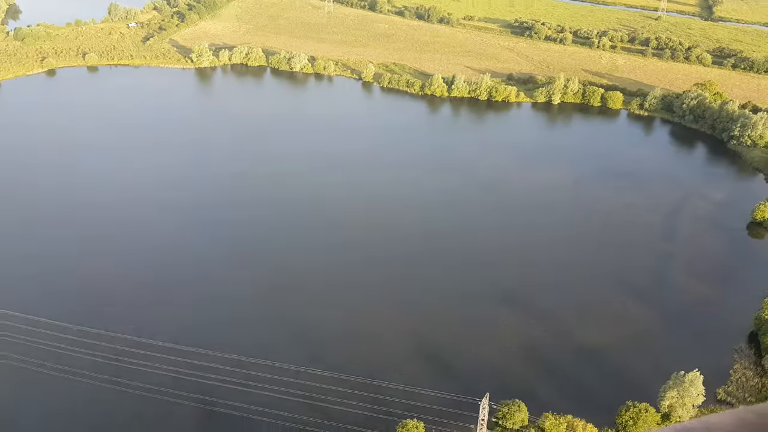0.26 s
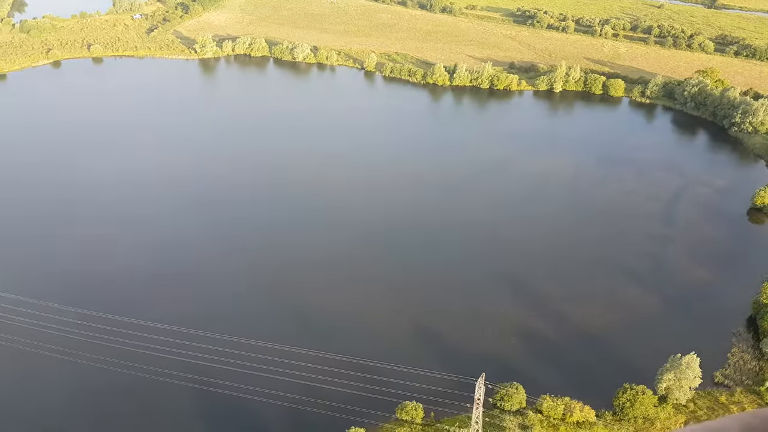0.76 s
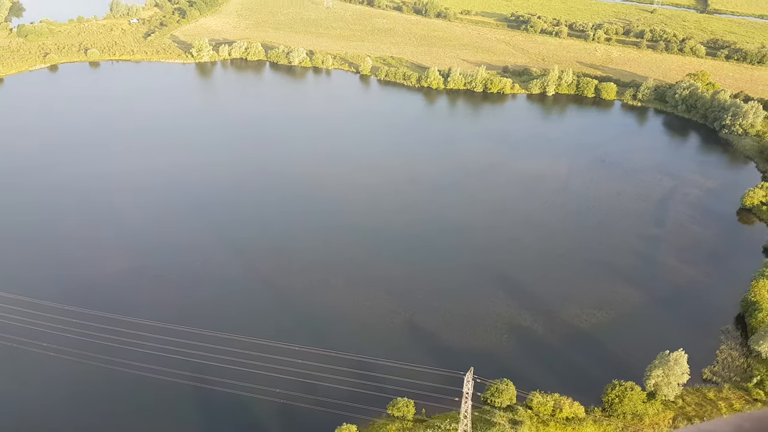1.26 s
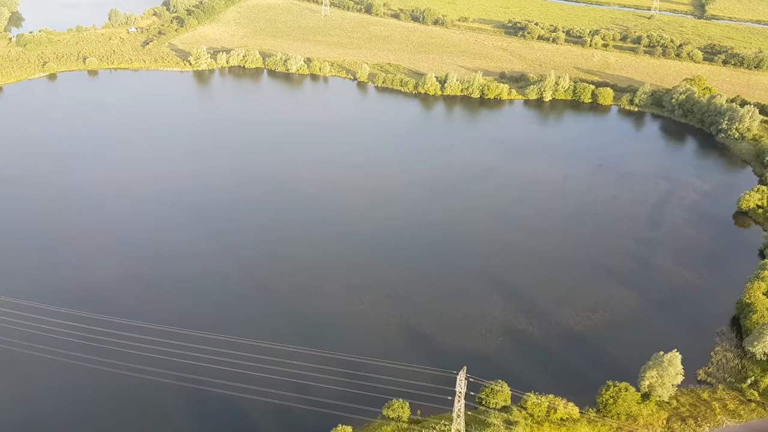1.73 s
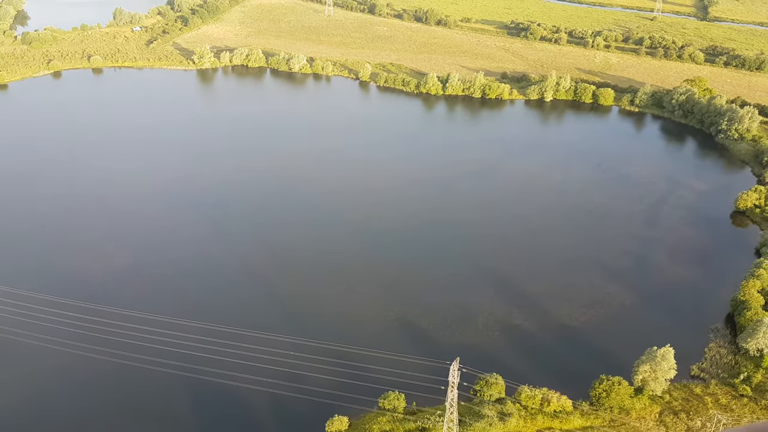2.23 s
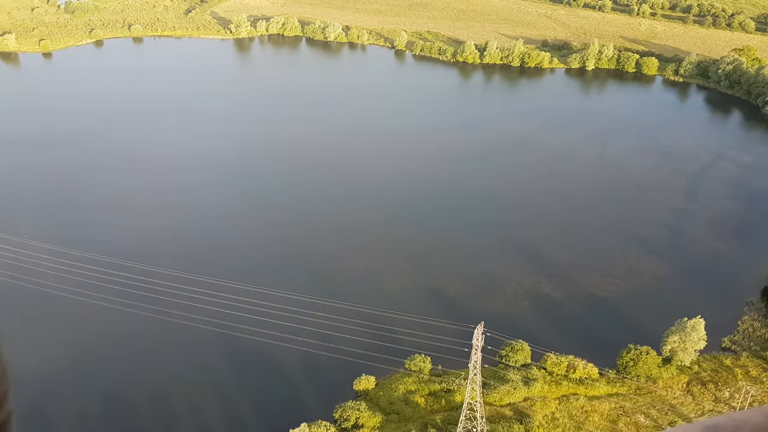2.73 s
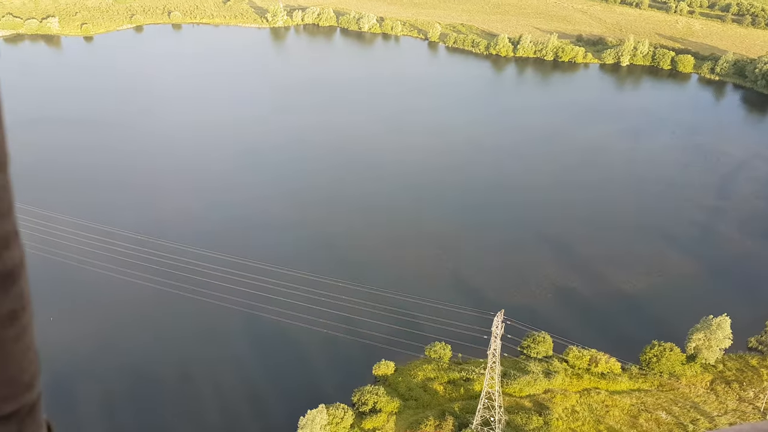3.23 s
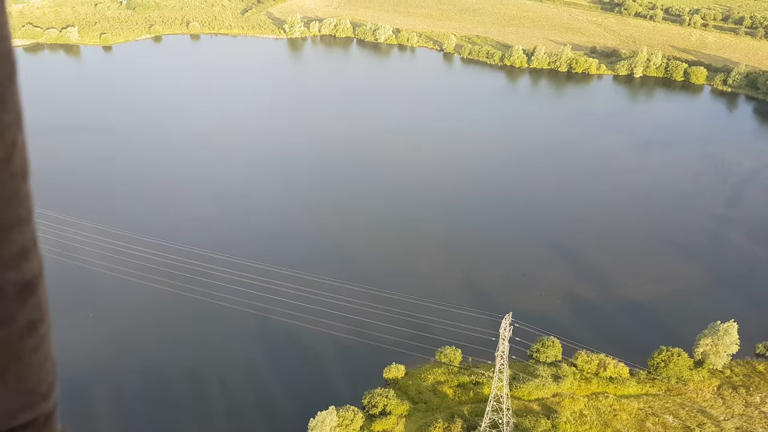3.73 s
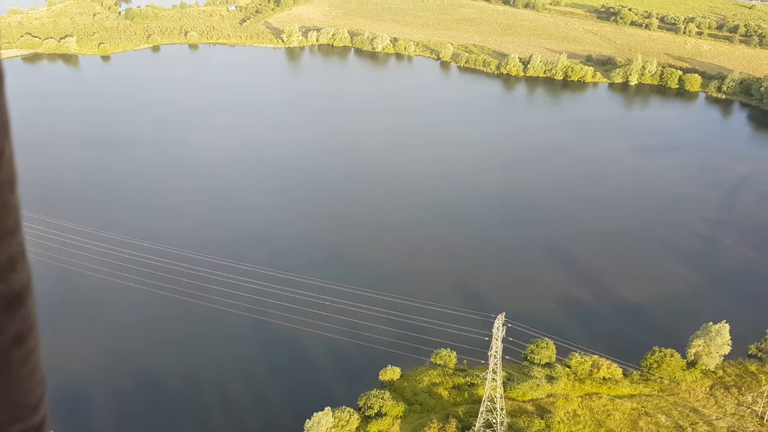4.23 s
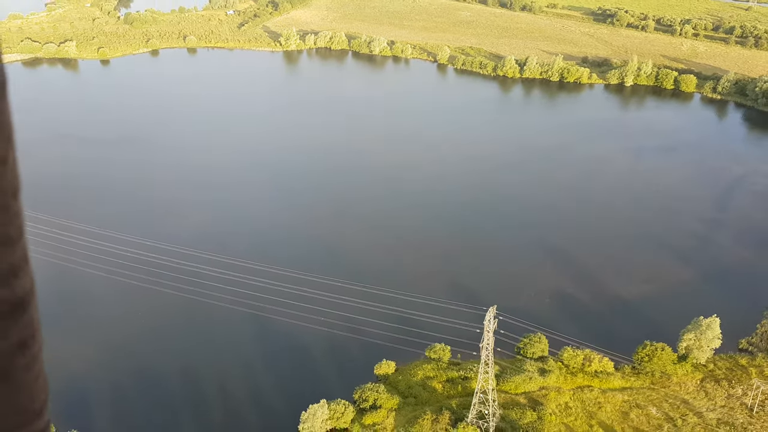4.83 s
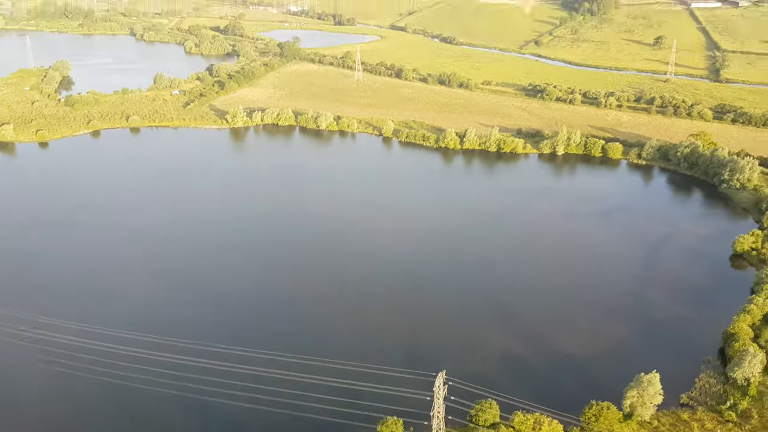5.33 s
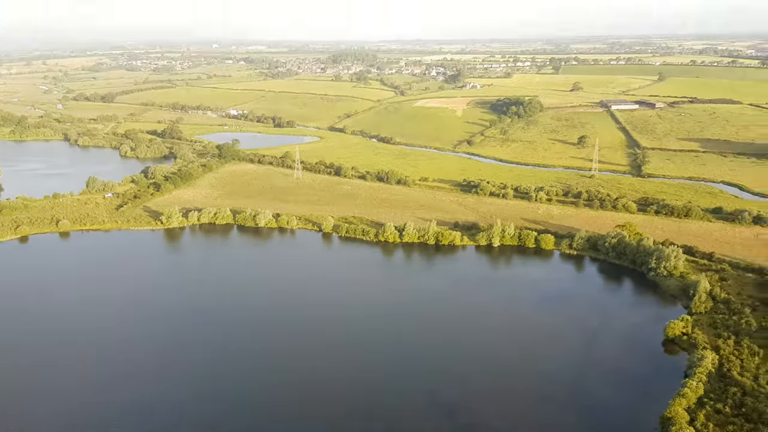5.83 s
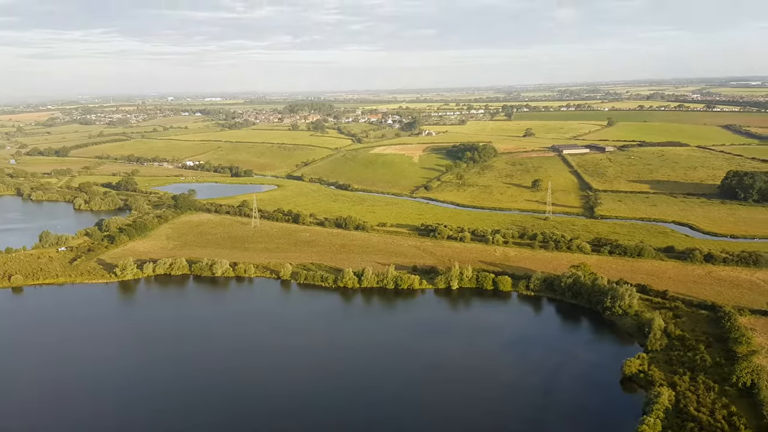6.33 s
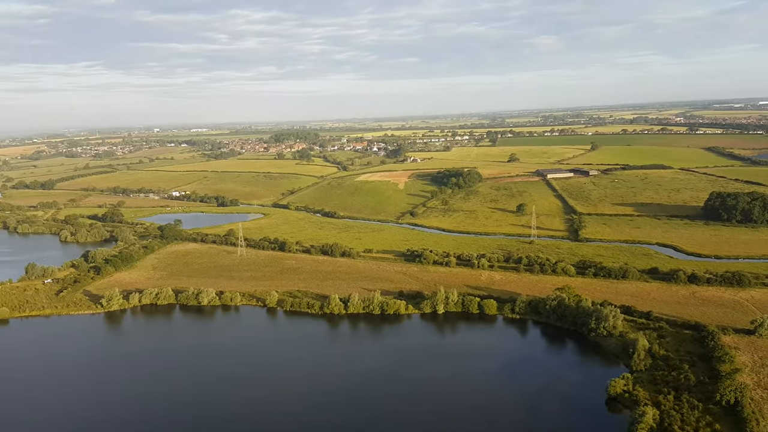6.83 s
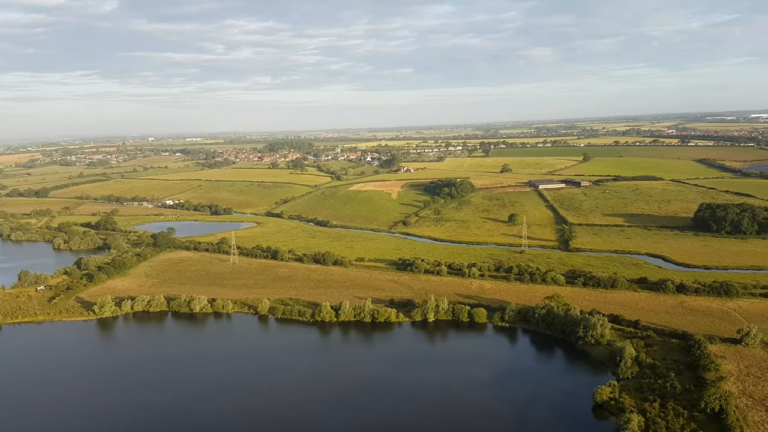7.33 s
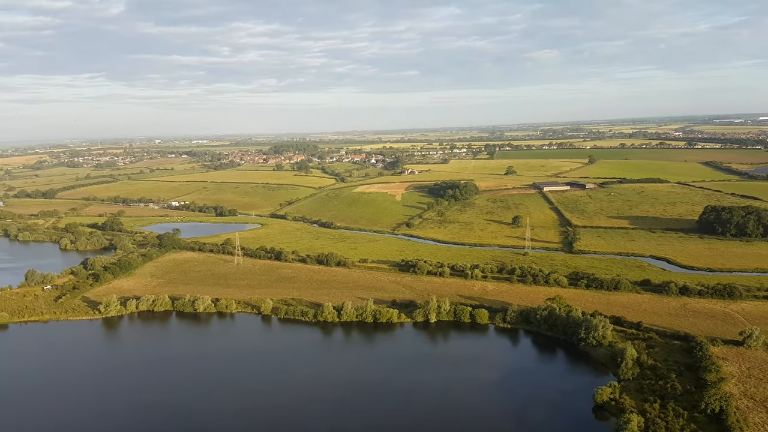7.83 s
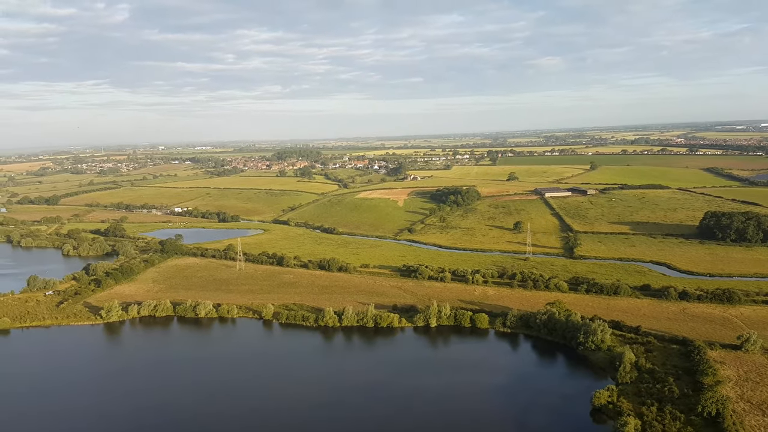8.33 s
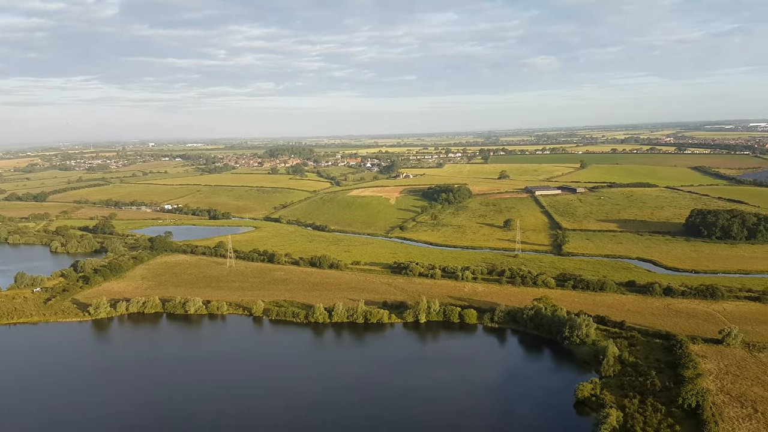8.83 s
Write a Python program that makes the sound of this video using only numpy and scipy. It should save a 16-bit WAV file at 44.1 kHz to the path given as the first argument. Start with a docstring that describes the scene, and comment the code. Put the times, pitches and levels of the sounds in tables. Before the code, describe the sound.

Five quiet seconds of thin, resonant gas hiss with dull wind bumps and a few soft cloth brushes, over barely audible far traffic. Then a sudden burner blast with a low ignition thump, rough roaring flame and sharp jet hiss, lasting nearly two seconds and ending in a deep flutter. After a subdued lull, it blasts again at full force to the cut. Open air, handheld stereo microphone in the basket, automatic gain pulling down under each blast.

```python
"""A pilot flame hisses steadily, soon joined by a far road, small puffs of air and a soft rustle.
Then a hot-air balloon's propane burner fires twice, heard from the basket high over quiet fields.
Filtered noise makes every source: the burner is a hissing gas jet and a roaring, turbulent flame.
As the valve eases shut after the first blast, the flame billows deeply and dies; the second burns to the end.
The recorder turns its gain down under each blast and slowly brings it back."""
import sys
import numpy as np
from scipy import signal
from scipy.fft import rfft, irfft, next_fast_len
from scipy.io import wavfile
from scipy.ndimage import map_coordinates

SR = 44100
rng = np.random.default_rng(int(sys.argv[2]) if len(sys.argv) > 2 else 0)


def file_out(sig):
    """Save sig as 16-bit WAV at sys.argv[1]."""
    # one column per channel
    cols = np.atleast_2d(sig).T
    # limit, then scale
    lim = np.clip(cols, -1, 1)
    pcm = np.round(lim * 32767).astype(np.int16)
    wavfile.write(sys.argv[1], SR, pcm)


N = 399546
TIME = np.arange(N) / SR
SIZE = next_fast_len(N)
HZ = np.maximum(np.fft.rfftfreq(SIZE, 1 / SR), 1)   # at least 1 Hz, so its logarithm exists


def from_db(db):
    """Turn decibels into gain."""
    return np.exp(np.asarray(db) * (np.log(10) / 20))


def in_time(rows):
    """Read each column of a time curve at every sample."""
    seconds, *columns = np.transpose(rows)
    return [np.interp(TIME, seconds, column) for column in columns]


def over_hz(rows):
    """Read each column of a table at every frequency, along a logarithmic pitch scale."""
    hz, *columns = np.transpose(rows)
    return np.array([np.interp(np.log(HZ), np.log(hz), column) for column in columns])


def drift(rate_hz):
    """Smooth random wandering with spread 1; a higher rate wanders faster."""
    step = 20   # computed at every 20th sample, then joined by straight lines
    r = np.exp(-2 * np.pi * step * rate_hz / SR)
    noise = rng.standard_normal(N // step + 2002)
    slow = signal.lfilter([1], [1, -2 * r, r * r], noise)[2000:]   # skip the start-up
    return np.interp(np.arange(N) / step, np.arange(len(slow)), slow / slow.std())


def below(hz, order):
    """Gain that keeps what lies below a frequency; a higher order cuts more steeply."""
    return 1 / np.sqrt(1 + (HZ / hz) ** (2 * order))


def above(hz, order):
    """Gain that keeps what lies above a frequency."""
    return np.sqrt(1 - below(hz, order) ** 2)


def resonance(hz, width_hz):
    """A peak of height 1 that falls away on both sides."""
    return 1 / (1 + (2 * (HZ - hz) / width_hz) ** 2)


def turbulence(colour, likeness, phase):
    """Coloured noise at two microphone ports, partly shared and shifted in phase; their mean has rms 1."""
    mid, side = rfft(rng.standard_normal((2, SIZE)))
    alike = np.clip(likeness, 0, 1)
    ports = np.sqrt(1 + alike) * mid + np.sqrt(1 - alike) * side * [[1], [-1]]
    shift = np.exp(.5j * phase * [[1], [-1]])
    x = irfft(ports * colour * shift, SIZE)[:, :N]
    return x / x.mean(axis=0).std()


def swell(centre_s, length_s):
    """A rounded rise and fall about one moment."""
    span = np.linspace(-2, 2, 20)
    return np.interp(TIME, centre_s + span * abs(length_s), np.exp(-span ** 2), left=0, right=0)


def spells(rows, fade_s):
    """Each spell fades in, holds its level and fades out."""
    total = 0
    for start, end, db in rows:
        shape = np.interp(TIME, [start - fade_s, start, end, end + fade_s], [0, 1, 1, 0])
        total = total + from_db(db) * shape
    return total


# tyres on a far road, growing overall: (time [s], level before a slow waver [dB])
ROAD = [(0, -73), (1, -57), (3.1, -56.5), (5.1, -49.5), (8.35, -51.5)]


def far_road(centre_hz=1000, width_hz=400, waver_db=1.5):
    """Distance leaves only the tyres' band near a kilohertz."""
    level_db, = in_time(ROAD)
    tyres = turbulence(resonance(centre_hz, width_hz), 1.0, over_hz(PILOT_PHASE))
    return from_db(level_db + waver_db * drift(1.1)) * tyres


# spells of air moving past the microphone: (start [s], end [s], level before the lumps [dB])
BREEZES = [(0.7, 2.4, -61), (7.2, 7.7, -55)]
# the strongest single puffs: (time [s], level [dB], left minus right [dB])
PUFFS = [(0.537, -57, 2), (0.735, -54, -7), (0.8, -52, 0), (1.063, -51, 6), (1.24, -50, 4),
         (1.355, -48, -3), (1.605, -51.5, 2), (1.91, -54, 16), (2.095, -53, -17), (2.204, -54, -4),
         (2.853, -58, -14), (7.62, -55, 13)]
# colour of the moving air: (frequency [Hz], relative level [dB per Hz])
BREEZE_COLOUR = [(25, -14), (60, 2), (100, 0.5), (170, -2), (260, -7), (400, -13), (800, -15), (3000, -65)]
CALM_DB, BREEZE_FADE_S, PUFF_S = -69, 0.19, 0.032


def breeze(lump_db=2.5, lumps_hz=22):
    """Lumps of moving air nudge the microphone, differently at each port."""
    lumps = from_db(lump_db * np.array([drift(lumps_hz), drift(lumps_hz)]))
    push = (from_db(CALM_DB) + spells(BREEZES, BREEZE_FADE_S)) * lumps
    for s, db, pan_db in PUFFS:
        push = push + from_db([[db + pan_db / 2], [db - pan_db / 2]]) * swell(s, PUFF_S)
    return push * turbulence(from_db(over_hz(BREEZE_COLOUR)), 0.12, np.zeros(1))


# spells of soft rubbing: (start [s], end [s], level before the uneven catching [dB])
RUSTLES = [(2.2, 2.55, -54), (4.05, 4.2, -51), (4.33, 4.83, -45.5)]
# short brushes within the rustle: (time [s], level [dB])
BRUSHES = [(2.259, -42.5), (2.325, -46), (2.403, -46), (2.467, -45), (2.542, -43), (4.16, -44.5),
           (4.29, -47)]
# colour of the rubbing: (frequency [Hz], relative level [dB per Hz])
RUSTLE_COLOUR = [(40, -16), (130, -8), (260, 0.5), (420, 2.5), (650, -4), (1000, -5.5), (1600, -16),
                 (5000, -53)]
RUSTLE_FADE_S = 0.12


def rustle(catch_db=1.0, brush_s=0.0069, brush_low_hz=220, brush_top_hz=1100):
    """A dull, uneven rubbing with a few short, brighter strokes, as of a sleeve."""
    rubbing = spells(RUSTLES, RUSTLE_FADE_S) * from_db(catch_db * drift(33))
    rub = rubbing * turbulence(from_db(over_hz(RUSTLE_COLOUR)), 0.93, np.zeros(1))
    strokes = sum(from_db(db) * swell(s, brush_s) for s, db in BRUSHES)
    brush_colour = above(brush_low_hz, order=1) * below(brush_top_hz, order=3)
    return rub + strokes * turbulence(brush_colour, .8, np.zeros(1))


def basket(share, count=10):
    """Frame, cylinders and wicker scatter the treble: faint echoes of a few ms, different at each port."""
    taps = np.zeros((2, SIZE))
    for port in taps:
        delays_s = rng.uniform(.001, .012, count)
        port[(delays_s * SR).astype(int)] = rng.choice([-1, 1], count)
    return 1 + share / np.sqrt(count) * rfft(taps) * above(2250, order=2)


# the pilot's broad rush: (frequency [Hz], relative left level [dB], relative right level [dB])
PILOT_BED = [(25, -18, -21), (90, -17, -17), (170, -18.5, -18.5), (422, -14, -13.5), (570, -17, -13.5),
             (1190, -13.5, -10), (2900, -25.5, -21.5), (4370, -26.5, -19.5), (6240, -33.5, -28),
             (8800, -36.5, -37.5), (15500, -34, -43)]


def pilot_colour(modes):
    """Resonances standing out of a broad rush, scattered by the basket."""
    power = from_db(over_hz(PILOT_BED)) ** 2
    for hz, width_hz, left_db, right_db in modes:
        power = power + (from_db([[left_db], [right_db]]) * resonance(hz, width_hz)) ** 2
    return np.sqrt(power) * basket(share=0.38)


# resonances of the pilot's hiss, microphone facing down:
# (frequency [Hz], width [Hz], relative left level [dB], relative right level [dB])
PILOT_MODES = [(1480, 140, -12.5, -12), (1946, 230, -11.5, 1.5), (2060, 680, -16, -6),
               (3340, 400, -17, -7.5), (3910, 330, -16, -8.5), (4390, 166, -38, -11), (5295, 310, -27, -14),
               (7100, 740, -28, -23), (7700, 670, -31, -24.5), (10700, 530, -37, -39),
               (11331, 530, -30.5, -28), (13168, 926, -30, -29), (14592, 1100, -34, -27)]
# the same columns with the microphone facing the horizon
PILOT_MODES_AHEAD = [(1440, 350, -25, -26), (1875, 210, -8.5, 1.5), (2250, 200, -16, -9),
                     (3240, 70, -14, -4.5), (3670, 710, -27, -16.5), (4400, 600, -44, -29),
                     (4970, 300, -35, -16), (7000, 900, -31, -22), (7540, 790, -43, -32),
                     (10500, 600, -35, -32), (11160, 600, -26, -28), (13150, 800, -41, -28),
                     (14550, 1000, -33, -30)]
# how alike the pilot is at the two ports: (frequency [Hz], likeness [0 to 1])
PILOT_LIKENESS = [(80, 0.98), (280, 0.97), (750, 0.31), (1050, 0.9), (1400, 0.3), (1900, 0.9), (3500, 0.21),
                  (9000, .2)]
# how far the left port leads, for the road too: (frequency [Hz], phase lead [rad])
PILOT_PHASE = [(100, 0), (800, -.7), (1000, -1.4), (1300, -2.9), (1900, -2.2), (2400, -.5), (4000, -.8),
               (7000, -2)]
TURN_STARTS_S, TURN_ENDS_S = 5.1, 5.3   # the microphone tilts up
# hiss and low rush before wavering, and the gain added to both once facing the horizon
PILOT_HISS_DB, PILOT_RUSH_DB, PILOT_AHEAD_DB = -50, -51.5, 0.8


def pilot(split_hz=1600, waver_db=0.75, sway_rad=0.23, wander=0.008):
    """A small steady flame hisses in its tube; its colour changes as the microphone sways and turns."""
    likeness, phase = over_hz(PILOT_LIKENESS), over_hz(PILOT_PHASE)
    down, ahead = pilot_colour(PILOT_MODES), pilot_colour(PILOT_MODES_AHEAD)
    treble = above(split_hz, order=6)
    tilt = np.interp(TIME, [TURN_STARTS_S, TURN_ENDS_S], [0, 1])
    turn = tilt * np.pi / 2 + sway_rad * drift(0.55)
    hiss = np.cos(turn) * turbulence(down * treble, likeness, phase)
    hiss = hiss + np.sin(turn) * turbulence(ahead * treble, likeness, phase)
    rush = turbulence(down * below(split_hz, order=6), likeness, phase)
    # reading the hiss slightly faster or slower makes its resonances wander
    reading = np.cumsum(1 + wander * drift(0.6))
    hiss = np.array([map_coordinates(port, [reading], order=3, mode="mirror") for port in hiss])
    hiss = from_db(PILOT_HISS_DB + waver_db * drift(22)) * hiss
    rush = from_db(PILOT_RUSH_DB + waver_db * drift(7)) * rush
    return from_db(PILOT_AHEAD_DB * tilt) * (hiss + rush)


# colour of the gas jet: (frequency [Hz], relative level [dB per Hz])
JET = [(1300, 2), (1850, -7), (2220, -6), (3000, -4), (3300, -12.5), (3810, -9.5), (5850, -11), (6600, -11),
       (7680, -7), (9100, -18), (10600, -13), (12300, -11), (15800, -9.5)]
# resonances of the burner around the jet:
# (frequency [Hz], width [Hz], left boost [dB], right boost [dB])
JET_MODES = [(1470, 180, 0.5, 2.5), (2210, 200, -5, 5), (2873, 170, -9, -7.5), (3760, 330, 2.5, 2.5),
             (7560, 260, -6.5, -0.5)]


def jet_colour():
    """Broad hiss with the burner's resonances on it, scattered by the basket."""
    peaks_db = 0
    for hz, width_hz, left_db, right_db in JET_MODES:
        peaks_db = peaks_db + np.array([[left_db], [right_db]]) * resonance(hz, width_hz)
    return from_db(over_hz(JET) + peaks_db) * basket(share=0.31)


# how alike the burner is at the two ports: (frequency [Hz], likeness [0 to 1])
BURNER_LIKENESS = [(100, .999), (450, 0.97), (950, 1), (1300, 0.79), (2300, 0.54), (4000, 0.24),
                   (8000, 0.41), (15000, 0.12)]
# the burner's balance: (frequency [Hz], left minus right [dB])
BURNER_BALANCE = [(60, 2), (92, -2.5), (140, 0), (210, -1.5), (330, -1.0), (500, -2.5), (770, -2),
                  (1170, -2), (1790, -2.5), (2740, 0.5), (4190, -4.5), (6410, -2.5), (9810, -0.5),
                  (15000, -1.0)]
# how far the left port leads: (frequency [Hz], phase lead [rad])
BURNER_PHASE = [(60, -.15), (180, -.26), (370, -.43), (700, -.72), (1150, -1.1), (1500, -2.7), (2500, -2.5),
                (3300, -3.6), (4500, -5.9), (6200, -7.7), (7500, -9.8), (10000, -12.5), (15000, -17.5)]


def from_burner(colour):
    """Turbulence arriving from overhead, a little to the right."""
    lean = from_db(.5 * over_hz(BURNER_BALANCE) * [[1], [-1]])
    return turbulence(colour * lean, over_hz(BURNER_LIKENESS), over_hz(BURNER_PHASE))


# each part of the burner: (base level [dB], change per dB of gas flow [dB])
BILLOW, ROAR, RASP, HISS = (-12, 0.79), (-4, 0.91), (-7.5, 1), (-21, 0.74)
# the first gas lights with a thump and the jet surges: (delay [s], width [s], boost [dB])
IGNITION, SURGE = (0.044, 0.019, 9.1), (0.097, 0.056, 3.9)
# the valve snaps open; easing lowers the flow; once it is shut the flame outlives the gas
OPEN_S, EASED_DB, GAS_DIES_S, FLAME_DIES_S = 0.15, -10, 0.125, 0.15
# a starved flame goes soft and billows: boost, fully reached at this share of the easing
SOFT_FLAME_DB, SOFT_FLAME_AT = 14, 0.77
# vapour left in the coils burns on faintly: level against the full fire, and how long it lasts
AFTERBURN_DB, AFTERBURN_S = -36, 0.93


def blast(opens, eases, shuts, level_db, extra_rasp_db):
    """Gains of billow, roar, rasp and hiss in one blast: each follows the gas by a power law, then dies."""
    opening = from_db(level_db) * (1 - np.exp(-np.maximum(TIME - opens, 0) / OPEN_S))
    eased = np.interp(TIME, [eases, shuts], [0, 1])
    since_shut = np.maximum(TIME - shuts, 0)
    gas = np.exp(-(since_shut / GAS_DIES_S) ** 3)
    fire = np.exp(-(since_shut / FLAME_DIES_S) ** 3)
    vapour = np.sqrt(np.interp(TIME, [shuts, shuts + AFTERBURN_S], [1, 0]))
    low_fire = np.maximum(fire, from_db(AFTERBURN_DB) * vapour)
    thump_db, surge_db = (db * swell(opens + delay_s, width_s) for delay_s, width_s, db in (IGNITION, SURGE))
    soft_db = SOFT_FLAME_DB * np.minimum(eased / SOFT_FLAME_AT, 1)
    parts = [(BILLOW, low_fire, thump_db + soft_db), (ROAR, low_fire, 0),
             (RASP, fire, extra_rasp_db), (HISS, gas, surge_db)]
    gains = []
    for (db, follows), alive, extra_db in parts:
        gains.append(opening * alive * from_db(db + follows * EASED_DB * eased + extra_db))
    return np.array(gains)


# pulls on the burner valve, the last one still fully open when the sound ends:
# (opens [s], starts to ease [s], starts to shut [s], relative level [dB], extra rasp [dB])
BLASTS = [(5.117, 6.22, 6.92, -1.5, 1.5), (8.372, 9.5, 10.2, 2, 1)]
# colour of the flame: (frequency [Hz], relative level [dB per Hz])
FLAME = [(15, -60), (25, -25), (139, -5), (197, -7.5), (262, -0.5), (312, -5.5), (366, 2), (429, -5.5),
         (477, -5), (530, -8.5), (703, -7), (949, -10), (1110, -13), (1330, -23), (1700, -39), (2210, -61),
         (3740, -120)]


def burner(billow_hz=220, eddy_hz=520, jet_hz=1400, top_hz=4000, flutter_db=1.15, billow_flutter_db=2.38,
           sputter_db=0.97, flame_share=0.24, flare_db=0.25, body_db=-4.0, top_db=3.0):
    """Large eddies billow, smaller ones roar and rasp, and the jet that feeds them hisses."""
    billowing, roaring, rasping, hissing = sum(blast(*row) for row in BLASTS)
    flame = from_db(over_hz(FLAME))
    jet = jet_colour() * above(jet_hz, order=8)
    flutter = drift(25)   # the whole flame flutters together
    flicker = from_db(flutter_db * flutter)
    billow = from_burner(flame * below(billow_hz, order=6))
    billow = billowing * from_db(billow_flutter_db * flutter) * billow
    roar_band = above(billow_hz, order=6) * below(eddy_hz, order=6)
    roar = roaring * flicker * from_burner(flame * roar_band)
    rasp_band = above(eddy_hz, order=6) * below(jet_hz, order=8)
    rasp = rasping * flicker * from_burner(flame * rasp_band)
    sputter = sputter_db * drift(42)
    # the lower hiss partly follows the flame
    share = np.clip(flame_share, 0, 1)
    body_gain = hissing ** (1 - share) * rasping ** share
    body_gain = body_gain * from_db(body_db + sputter + flare_db * drift(37))
    body = body_gain * from_burner(jet * below(top_hz, order=4))
    top = hissing * from_db(top_db + sputter) * from_burner(jet * above(top_hz, order=4))
    return billow + roar + rasp + body + top


def scene():
    """Open air: only the basket reflects."""
    return far_road() + breeze() + rustle() + pilot() + burner()


# the recorder's gain control; the slope is dB of cut per dB above the threshold
GAIN_THRESHOLD_DB, GAIN_SLOPE, GAIN_ATTACK_S, GAIN_RELEASE_DB_PER_S = -11.5, 0.85, 0.008, 8


def gain_control(x, window_s=0.0086):
    """Loud sound pulls the gain down quickly; it creeps back at a steady rate."""
    window = window_s * SR
    power = signal.lfilter([1], [1, -np.exp(-1 / window)], np.mean(x ** 2, axis=0)) / window
    excess_db = GAIN_SLOPE * np.maximum(10 * np.log10(power + 1e-12) - GAIN_THRESHOLD_DB, 0)
    # hold the largest cut so far, less what has been recovered since
    recovery_db = GAIN_RELEASE_DB_PER_S * TIME
    held_db = np.maximum.accumulate(excess_db + recovery_db) - recovery_db
    r = np.exp(-1 / (GAIN_ATTACK_S * SR))
    cut_db = signal.lfilter([1 - r], [1, -r], held_db)
    return x * from_db(-cut_db)


def record(dry, bass_cut_hz=33, top_cut_hz=15800):
    """The gain ducks under the blasts, the highest peaks are rounded, the deepest bass and top are cut."""
    ducked = gain_control(dry)
    rounded = ducked / (1 + (ducked / .95) ** 4) ** .25   # peaks stay below 0.95 before the cuts
    kept = above(bass_cut_hz, order=3) * below(top_cut_hz, order=160)
    return irfft(rfft(rounded, SIZE) * kept, SIZE)[:, :N]


dry = scene()
out = record(dry)
file_out(out)
```